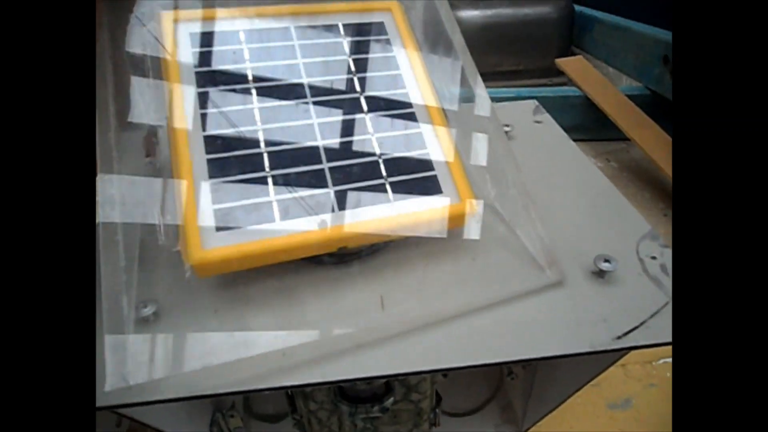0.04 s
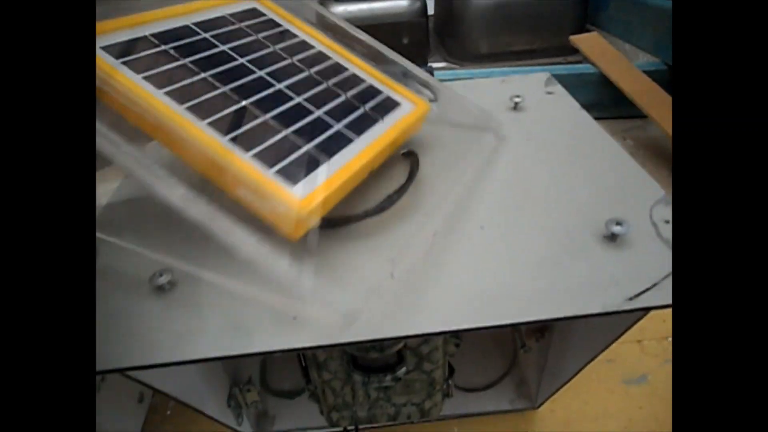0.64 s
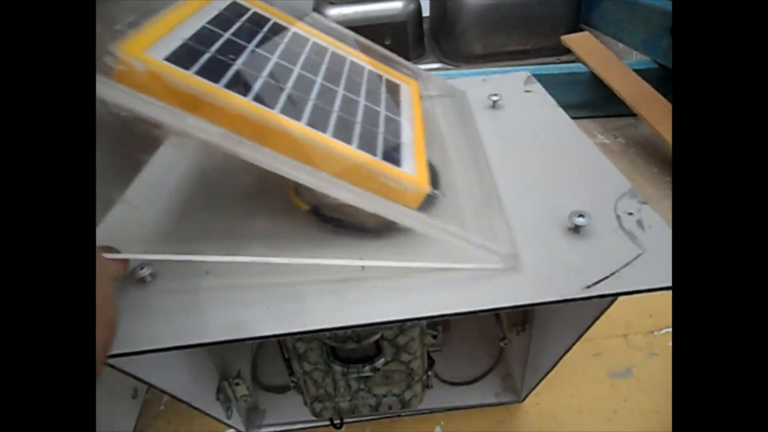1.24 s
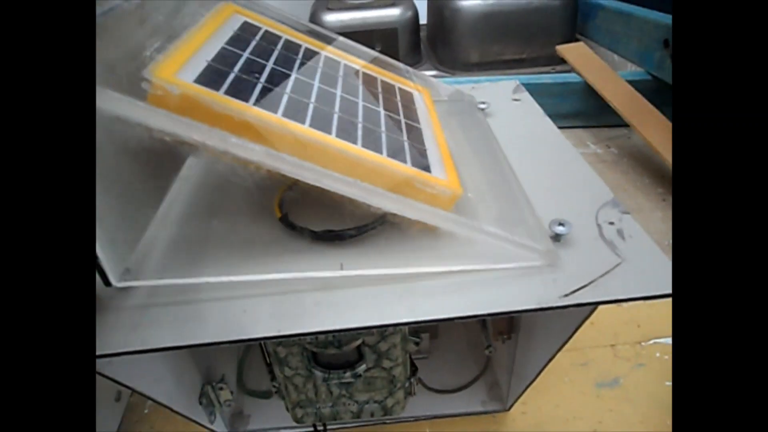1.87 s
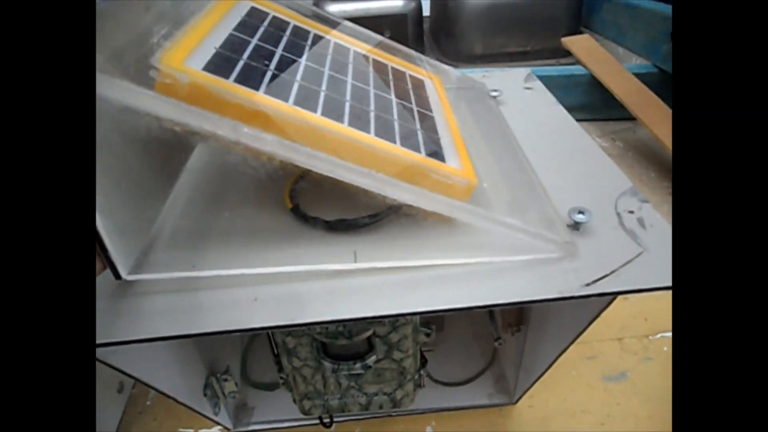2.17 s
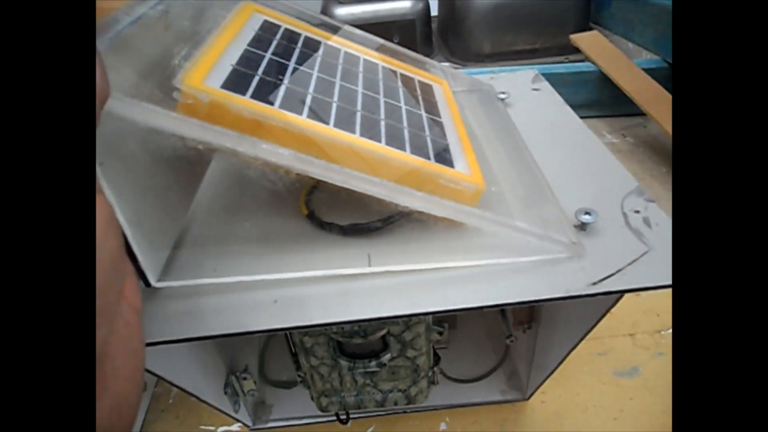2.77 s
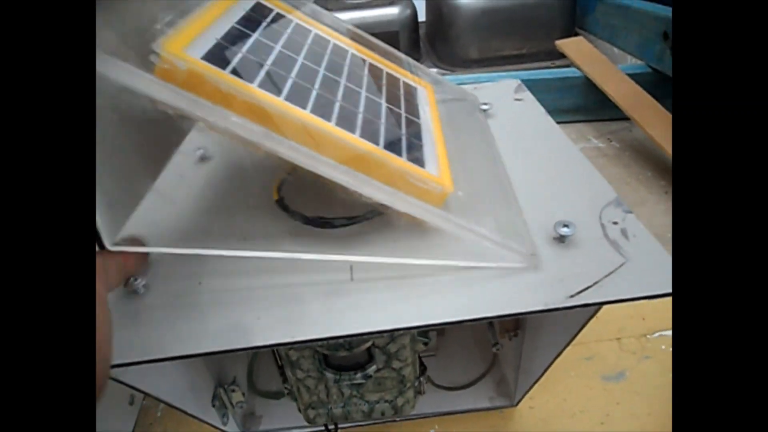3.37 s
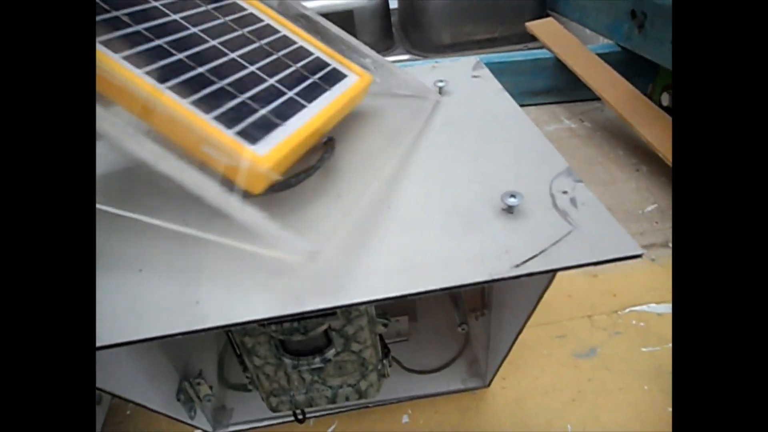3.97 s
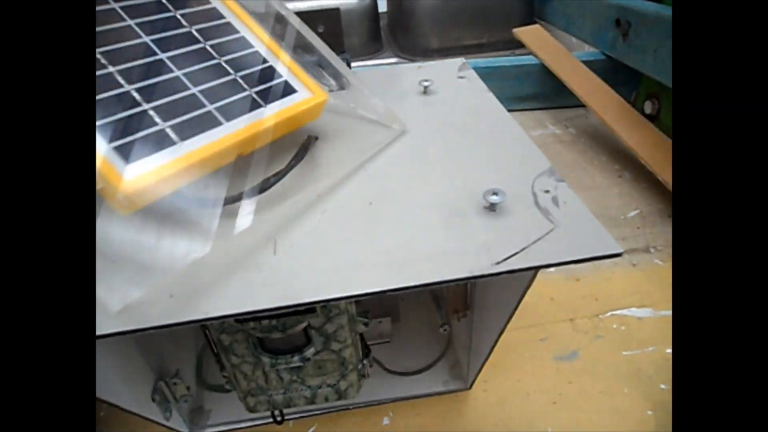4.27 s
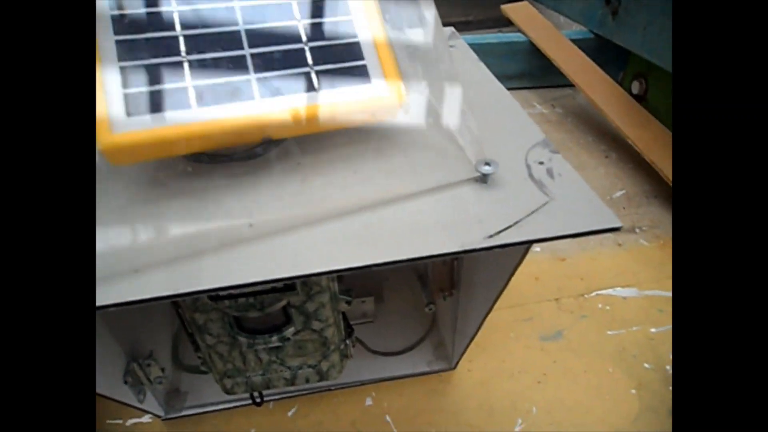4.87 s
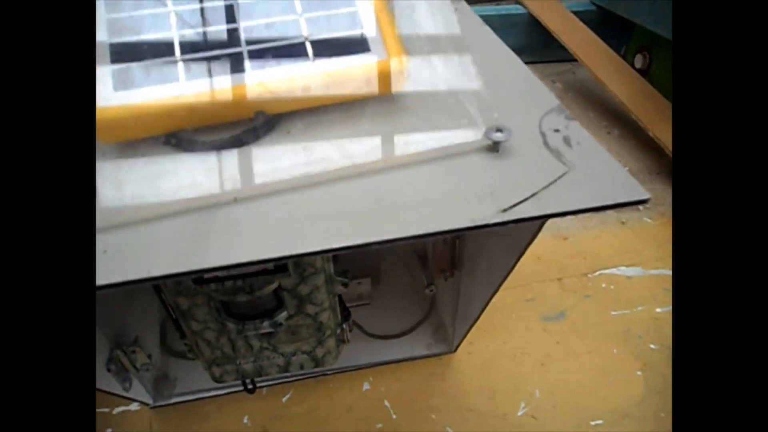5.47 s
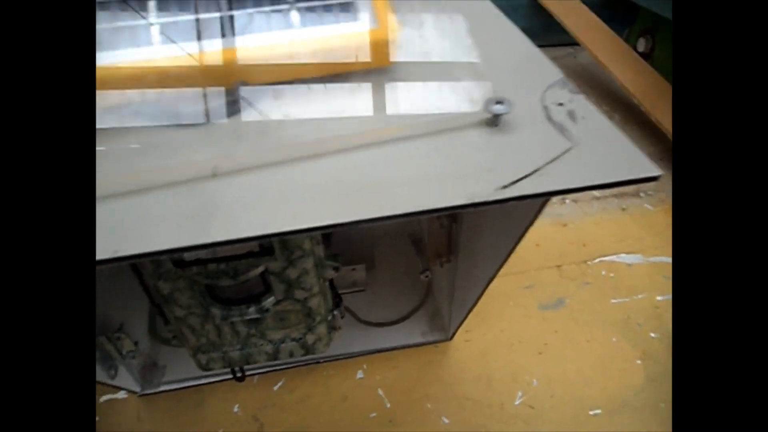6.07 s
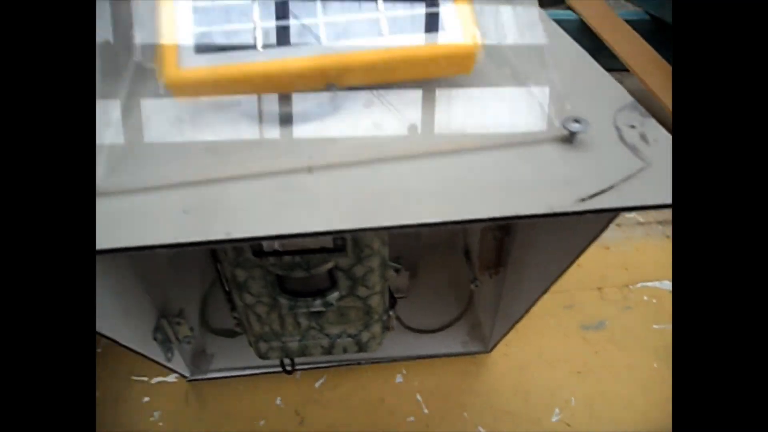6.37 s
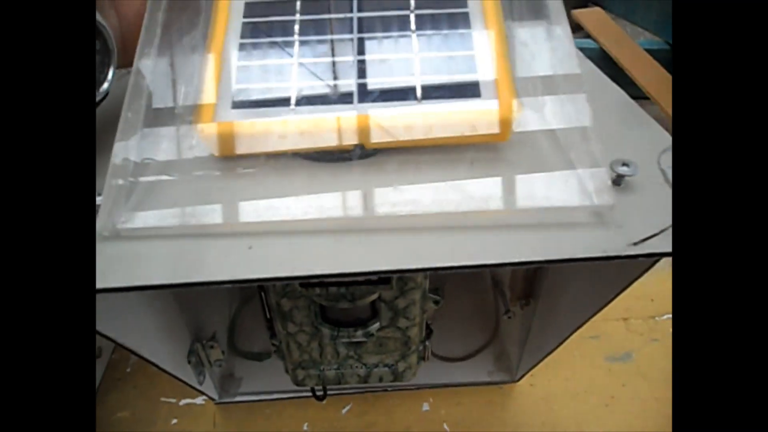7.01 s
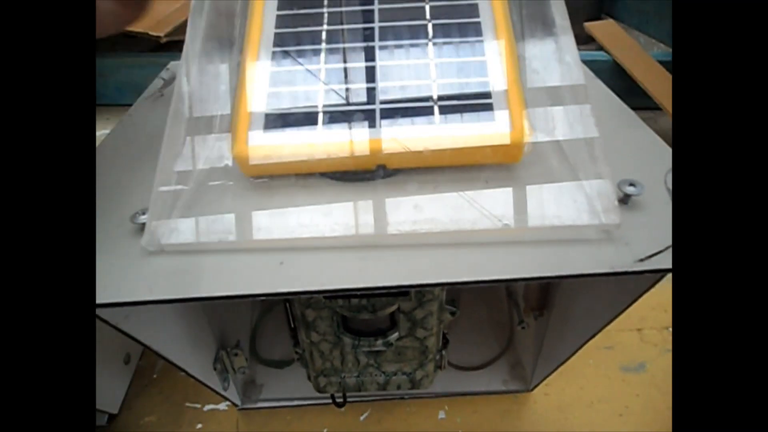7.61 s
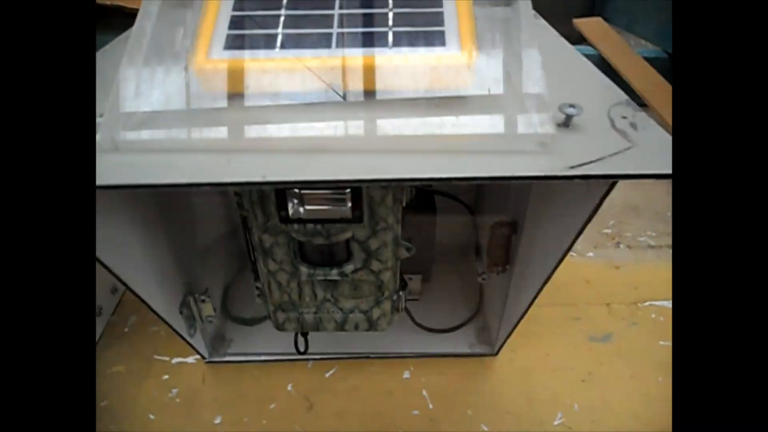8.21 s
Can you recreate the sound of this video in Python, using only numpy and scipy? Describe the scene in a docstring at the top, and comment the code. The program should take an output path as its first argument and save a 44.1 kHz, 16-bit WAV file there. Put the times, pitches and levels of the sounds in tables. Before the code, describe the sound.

A plastic cover is moved about on the lid of a hollow box, close to the microphone. Light scraping and taps build to a loud, boomy knock at 0.7 seconds, followed by rattling, a slide and a brief squeak. Another squeaky scrape ends in a firm knock at 1.5 seconds. Soft rubbing and taps fade by 2.2, leaving only faint hiss and low hum until a knock at 3.2. Quiet sliding follows, with tiny squeaks around 4 seconds and a briefly ringing knock at 4.6. Scattered clicks and knocks run from 5.1 to 6.4, then crowd together with scrapes. The loudest thump lands at 6.9 with a sharp click, a squeak and a short chatter, settling by 7.3. One faint tick comes near 8.1. Each knock rings briefly, with a weak tail from nearby walls.

```python
"""Plastic cover on a hollow box

Close by, in mono: a clear plastic cover carrying a small solar panel is shifted, tilted up and set down
again on the lid of a hollow box. Its edges knock and slide: the box booms, lid and plastic sheet ring
briefly, hard corners click and squeak. Nearby walls return a weak tail; a faint hum and hiss lie behind."""
import sys
import numpy as np
from scipy import signal
from scipy.fft import rfft, irfft
from scipy.io import wavfile

SR = 44100
rng = np.random.default_rng(int(sys.argv[2]) if len(sys.argv) > 2 else 0)


def pcm_store(signal):
    """Save signal as 16-bit PCM."""
    levels = np.round(np.clip(np.atleast_2d(signal), -1, 1) * 32767)
    wavfile.write(sys.argv[1], SR, levels.astype(np.int16).T)


N = 363825
TIME = np.arange(N) / SR
AGE = TIME[:SR // 2]  # seconds since a blow

# the low hum behind the box: time_s, level_db
HUM_LEVELS = [(0, -75), (2.2, -59), (2.7, -66), (3, -58), (3.9, -59), (4.3, -67.5), (6.4, -64),
              (7.5, -77.5)]
# spectra of hiss, rubbing rim, grit, squeaking edge and tick: frequency_hz, relative_db
HISS_SPECTRUM = [(12, -11), (28, 2.5), (50, -4.5), (110, -0.5), (180, -3.5), (260, -8), (600, -10.5),
                 (1200, -14.5), (3000, -19), (6000, -22), (10000, -26.5)]
RUB_SPECTRUM = [(50, -29.5), (110, -6.5), (190, 1), (260, -11), (400, -7), (590, -2), (720, -6),
                (1000, -18), (1400, -22.5), (2500, -49)]
RASP_SPECTRUM = [(700, -10), (1100, 4), (1400, -11.5), (1680, 3.5), (2050, -3), (2350, -7.5), (2700, -3.5),
                 (3200, -15), (6000, -31.5)]
SQUEAK_SPECTRUM = [(2000, -14), (2600, 4), (3150, -9), (3700, -3), (3900, -10.5), (4300, 4.5), (4900, -14),
                   (5300, -11.5), (5700, 1.5), (6600, -27), (7800, -7), (10000, -43.5)]
TICK_SPECTRUM = [(2200, -19.5), (3200, -3.5), (3800, 6.5), (4900, -5.5), (5800, -3.5), (7500, -13.5),
                 (10000, -13.5)]
# the cover sliding on the lid: start_s, end_s, strength_db, grit_db (relative to strength)
RIM_SLIDES = [(0, 0.151, -47.5, -16), (0.188, .64, -56, -9), (0.77, 0.998, -43.5, -14.5),
              (1.158, 1.47, -51, -16.5), (1.469, 1.554, -39.5, -17.5), (1.616, 2.126, -53.5, -30),
              (3.244, 3.85, -55.5, -23), (3.927, 3.97, -43, -15), (4.016, 4.168, -49.5, -9.5),
              (4.336, 4.441, -47.5, -10.5), (4.62, 4.676, -43, -14), (4.69, 4.85, -56, -15),
              (5.813, 6.103, -54, -25), (6.581, 6.621, -38, -19), (6.755, 6.861, -42.5, -16),
              (6.878, 6.965, -37, -15), (6.97, 7.083, -45.5, -18.5), (7.1, 7.3, -56, -19)]
# a sharp edge dragging: start_s, end_s, strength_db
EDGE_SQUEAKS = [(.863, .91, -46), (1.473, 1.54, -53), (4.015, 4.16, -65), (6.875, 6.95, -51.5)]
# the cover striking the lid; length_factor stretches both the contact and the ring:
# start_s, strength_db, tilt_db_per_octave (hardness), sheet_ring_db, length_factor, favoured_hz
COVER_KNOCKS = [(.211, -61, 6, 7, 1.4, 572), (0.431, -54.5, -4, 5.5, 0.78, 584),
                (.505, -42.5, -2.5, 0.5, 0.84, 585), (.575, -45.5, -5.5, 6.5, 0.78, 580),
                (.622, -48.5, -1.5, 8, 0.78, 560), (0.7047, -21.5, 1.5, 1, 0.49, 385),
                (0.751, -34, -3, 1, 0.87, 560), (.804, -44.5, 3.5, 2.5, 0.54, 525),
                (.833, -45, -4.5, 6.5, 1.5, 555), (.864, -39, -0.5, -1.5, 1.66, 507),
                (.908, -39, -8, 1.5, 0.69, 667), (.976, -52, -10, -5, .4, 355),
                (1.046, -57.5, 2.5, 4, .7, 524), (1.141, -48.5, -12, 5, .85, 525),
                (1.334, -42.5, -2.5, 4, .75, 616), (1.538, -33.5, -1.6, 9, 0.66, 512),
                (1.892, -57.5, -10.5, 1.5, .95, 525), (1.954, -48, -9, 2, 0.74, 400),
                (2.069, -59, -11, -3, 0.63, 382), (2.11, -63, 1, -2, 1.14, 382),
                (3.19, -44, -5, -5, 0.82, 474), (3.591, -55.5, -4, 3, .5, 580),
                (3.894, -51, -4, -1, 0.98, 380), (3.978, -57, -9, -3, 0.57, 385),
                (4.169, -54.5, -1, 6, 1.12, 430), (4.406, -55.5, 1.5, 7, 0.84, 566),
                (4.598, -43, 1.5, 12, 0.87, 578), (4.94, -61.5, -11, 6.5, 0.6, 558),
                (5.147, -58.5, 2, 0, 0.93, 670), (5.176, -56, 3.5, -5.5, 1.07, 576),
                (5.306, -63.5, 6, -13, 0.57, 584), (5.52, -55.5, -12, 1, 0.93, 565),
                (5.532, -48, 1, 14, 0.58, 552), (5.647, -42.5, -4, -5, 0.47, 465),
                (5.713, -55, -4, -3, 0.97, 385), (5.758, -36.5, -4.5, -6, 0.54, 447),
                (6.182, -58.5, -2.5, -8, 0.86, 372), (6.325, -41.5, -1, 0.5, 0.72, 391),
                (6.571, -56.5, -14.5, 9, 0.73, 578), (6.595, -56.5, -7, 17, 1, 600),
                (6.664, -36, -7, 0.5, 0.7, 370), (6.761, -41, -1, 8, 0.6, 579),
                (6.817, -49, -3, 9, 0.7, 583), (6.868, -19.5, -0.5, -4, 0.91, 399),
                (6.914, -38, 2, 3, 0.53, 360), (7.006, -37.5, -6.5, -7, 0.53, 477),
                (7.046, -45.5, -6.5, -12, 0.67, 509)]
# modes of box, lid and cover together: pitch_hz, relative_db, t60_s
BODY_MODES = [(153, -6, 0.12), (178, -7, .08), (192.9, -2, 0.21), (236, -16, 0.13), (326, -5.5, 0.13),
              (385, -1, 0.14), (447, -7, .14), (472, -3.5, .14), (525.5, -6, 0.16), (559.2, -3.5, .13),
              (585, -8.5, 0.23), (669, -4.5, 0.089), (757.6, -5.5, .13), (855, -3, 0.075),
              (945, -0.5, 0.077), (980, -5.5, 0.062), (1039, 0, 0.052), (1214, -5, 0.073), (1540, -3, .08),
              (1693, -2, 0.064), (1842, -3.5, .09), (2050, -8.5, .08), (2186, -8.5, 0.1),
              (2320, -6.5, 0.031), (2605, 1, .07), (2630, -2, 0.04), (2970, -9, .09)]
# registers of a blow, each with a crowd of weak modes, then the topmost one, the ping:
# low_hz, high_hz, crowd_db, crowd_t60_s, rise_s
BODY_REGISTERS = [(130, 220, -5, 0.29, 0.0053), (300, 500, -11.5, .06, .002), (472, 600, -8, .05, 0.00069),
                  (800, 1120, -2, 0.063, .0012), (1432, 2000, 2, .025, .001)]
TOP_REGISTER = (2200, 2850, 2.9, 0.043, 0.0012)
# hard corners catching: start_s, level_db
CORNER_CLICKS = [(.804, -49), (.909, -51), (1.54, -45.5), (4.101, -53), (5.147, -53.5), (5.177, -48.5),
                 (6.663, -44.5), (6.8725, -28), (6.914, -44.5), (7.182, -58), (8.123, -61)]
# a corner letting go: start_s, length_s, start_hz, end_hz, level_db
CORNER_SQUEAL = (3.94, .026, 2200, 1800, -54)

PIVOT_HZ, KNEE_HZ, ROLLOFF_DB_PER_OCTAVE = 400, 1000, 14  # spectrum of a blow
TAIL_DB, TAIL_T60_S = -20.5, 0.6  # return from walls and clutter


def from_db(db):
    return 10 ** (np.asarray(db) / 20)


def unit_rms(x, size=None):
    """Scale to rms 1 over the first `size` samples."""
    return x / np.sqrt(np.mean(x[:size] ** 2) + 1e-20)


def decay(t60):
    """Envelope that falls 60 dB in t60 seconds."""
    return np.exp(-np.log(1000) * AGE / max(t60, 1e-3))


def add(out, start_s, sound):
    at = max(round(start_s * SR), 0)
    out[at:at + len(sound)] += sound[:N - at]


def noise_band(low_hz, high_hz, order):
    """Half a second of band-passed noise, taken once the filter has settled; rms 1."""
    sos = signal.butter(order, [low_hz, high_hz], "band", fs=SR, output="sos")
    noise = rng.standard_normal(len(AGE))
    return unit_rms(signal.sosfilt(sos, np.tile(noise, 2))[len(AGE):])


def coloured(x, spectrum):
    """Filter a steady sound by a spectrum; rms 1."""
    hz, db = np.transpose(spectrum)
    bins_hz = np.maximum(np.fft.rfftfreq(len(x), 1 / SR), 1)
    gain = from_db(np.interp(np.log(bins_hz), np.log(hz), db))
    return unit_rms(irfft(rfft(x) * gain, len(x)))


def drift(rate_hz):
    """Random wander with a spread near 1."""
    return np.interp(TIME * rate_hz, np.arange(4096), rng.standard_normal(4096))


def hiss(early_db=-54, settled_db=-59, settles_s=.69):
    """An even hiss behind the box that steps down early on."""
    level_db = np.where(TIME < settles_s, early_db, settled_db)
    return from_db(level_db) * coloured(rng.standard_normal(N), HISS_SPECTRUM)


def hum(pitch_hz=76.2):
    """A faint low tone in the background, wavering slightly in pitch and level."""
    phase = 2 * np.pi * np.cumsum(pitch_hz + .5 * drift(5)) / SR
    level_db = np.interp(TIME, *np.transpose(HUM_LEVELS)) + 1.2 * drift(7)
    return from_db(level_db) * np.sqrt(2) * np.sin(phase)


def slips(per_s, spread_db):
    """Stick and slip: tiny jerks of uneven size, in clumps."""
    slipping = rng.random(N) < per_s * from_db(4 * drift(45)) / SR
    return slipping * rng.standard_normal(N) * from_db(spread_db * drift(90))


def strokes(rows, attack_s=.012, release_t60_s=.0998):
    """Gain for rows of start_s, end_s, level_db: each sets in quickly and dies when the rim stops."""
    gain = np.zeros(N)
    for start_s, end_s, level_db in rows:
        attack = np.clip(.5 + (TIME - start_s) / attack_s, 0, 1)
        release_db = -60 * np.clip((TIME - end_s) / release_t60_s, 0, 2)
        gain += attack * from_db(level_db + release_db)
    return gain


def sliding(rub_db=-5.5, rasp_db=-.5, squeak_db=-8):
    """Slips of the rim shake the same modes as the knocks; grit under it rasps, a sharp edge squeaks."""
    jerks = slips(per_s=700, spread_db=2.2) + 1e-18
    ring = np.zeros(N)
    for k, (hz, db, t60) in enumerate(BODY_MODES):
        radius = np.exp(-np.log(1000) / (t60 * SR))
        feedback = [1, -2 * radius * np.cos(2 * np.pi * hz / SR), radius ** 2]
        ring += (-1) ** k * from_db(db) * signal.lfilter([1 - radius, 0, radius - 1], feedback, jerks)
    grit = slips(per_s=2500, spread_db=2.5)
    rub = unit_rms(coloured(jerks, RUB_SPECTRUM) + from_db(-5) * coloured(ring, RUB_SPECTRUM))
    rasp = unit_rms(coloured(grit, RASP_SPECTRUM) + from_db(-6) * coloured(ring, RASP_SPECTRUM))
    squeak = coloured(grit, SQUEAK_SPECTRUM)
    rub_gain = strokes((start, end, db + rub_db) for start, end, db, _ in RIM_SLIDES)
    rasp_gain = strokes((start, end, db + grit_db + rasp_db) for start, end, db, grit_db in RIM_SLIDES)
    squeak_gain = from_db(squeak_db) * strokes(EDGE_SQUEAKS)
    return rub * rub_gain + rasp * (rasp_gain + chatter()) + squeak * squeak_gain


def blow_db(strength_db, tilt_db, hz):
    """Soft blows favour the bass, hard ones the treble; above the knee the plastic gives way."""
    tilt = tilt_db * np.log2(min(hz, KNEE_HZ) / PIVOT_HZ)
    rolloff = ROLLOFF_DB_PER_OCTAVE * np.log2(max(hz / KNEE_HZ, 1))
    return strength_db + tilt - rolloff


def registers():
    """Each register with its own modes, from the boom up to the ping."""
    groups = np.split(np.array(BODY_MODES), [4, 8, 12, 18, 23])
    return [(*register, modes) for register, modes in zip([*BODY_REGISTERS, TOP_REGISTER], groups)]


def struck_register(register, length, favoured_hz=0):
    """One register rings: the direct sound reaches the microphone, then a weak tail off nearby walls."""
    low_hz, high_hz, crowd_db, crowd_t60_s, rise_s, modes = register
    hz, db, t60 = modes.T
    first_30_ms = round(.03 * SR)
    # the point of contact picks out one note and weights the others anew
    db = db + 8 * np.exp(-((hz - favoured_hz) / 12) ** 2) + 2 * rng.standard_normal(len(hz))
    # each mode drops quickly as the contact damps it, then rings on faintly
    fades = np.array([decay(t * length) + from_db(-20) * decay(3.5 * t * length) for t in t60])
    tones = np.sin(2 * np.pi * (hz[:, None] * AGE + rng.random((len(hz), 1))))
    ring = unit_rms(from_db(db) @ (fades * tones), first_30_ms)
    crowd = unit_rms(noise_band(low_hz, high_hz, order=4) * decay(crowd_t60_s * length), first_30_ms)
    # a longer, softer contact sets in more slowly
    onset = 1 - np.exp(-(AGE / (.9 * rise_s * length)) ** 2)
    direct = unit_rms((ring + from_db(crowd_db) * crowd) * onset, first_30_ms)
    # the tail dies sooner in the treble
    tail_gain = from_db(TAIL_DB) * decay(TAIL_T60_S / (1 + low_hz / 2500)) * (1 - np.exp(-AGE / .015))
    return direct + tail_gain * noise_band(low_hz, high_hz, order=4)


def tick(t60_s=.0286):
    """The brief, bright noise of a hard contact."""
    return coloured(rng.standard_normal(len(AGE)), TICK_SPECTRUM) * decay(t60_s)


def knocks(tick_db=-22, sheet_register=2):
    """Each blow ticks and feeds the registers by strength and hardness; one on an edge rings the sheet."""
    out = np.zeros(N)
    for start_s, strength_db, tilt_db, sheet_db, length, favoured_hz in COVER_KNOCKS:
        for k, register in enumerate(registers()):
            centre_hz = np.sqrt(register[0] * register[1])
            level_db = blow_db(strength_db, tilt_db, centre_hz) + sheet_db * (k == sheet_register)
            add(out, start_s, from_db(level_db) * struck_register(register, length, favoured_hz))
        add(out, start_s, from_db(blow_db(strength_db, tilt_db, KNEE_HZ) + tick_db) * tick())
    return out


def shudder(thud_db=-25.5):
    """The whole box shakes under a long, soft contact; a brief one hardly moves it."""
    out = np.zeros(N)
    for start_s, strength_db, tilt_db, _, length, _ in COVER_KNOCKS:
        gain = from_db(blow_db(strength_db, tilt_db, hz=130) + thud_db) * min(length, 1) ** 3
        shake = noise_band(low_hz=28, high_hz=115, order=2)
        add(out, start_s, gain * shake * decay(TAIL_T60_S * length))
    return out


def chatter(heavy_above_db=-25, relative_db=-20, t60_s=.36):
    """Extra gain for the rasp: after a heavy drop the cover chatters on the lid, dying away."""
    gain = np.zeros(N)
    for start_s, strength_db, _, _, length, _ in COVER_KNOCKS:
        if strength_db > heavy_above_db:
            add(gain, start_s, from_db(strength_db + relative_db) * length * decay(t60_s))
    return gain


def clicks(ping_db=-6.5):
    """A hard corner catches: it ticks and briefly rings the highest modes."""
    out = np.zeros(N)
    for start_s, level_db in CORNER_CLICKS:
        click = tick() + from_db(ping_db) * struck_register(registers()[-1], length=.85)
        add(out, start_s, from_db(level_db) * click)
    return out


def squeal(roughness=.04):
    """A corner lets go with a short, rough tone whose pitch falls as the slip slows."""
    start_s, length_s, start_hz, end_hz, level_db = CORNER_SQUEAL
    progress = np.clip((TIME - start_s) / length_s, 0, 1)
    pitch_hz = (start_hz + (end_hz - start_hz) * progress) * (1 + roughness * drift(400))
    tone = np.sqrt(2) * np.sin(2 * np.pi * np.cumsum(pitch_hz) / SR)
    return from_db(level_db) * np.sin(np.pi * progress) * tone


def scene():
    """Cover and box in front, hiss and hum behind, all at one microphone."""
    return (knocks() + shudder() + clicks() + sliding() + squeal() + hiss() + hum())[None]


def record(dry):
    """The highest peaks are rounded off and the treble is cut steeply."""
    ceiling, cutoff_hz = .88, 10700
    rounded = dry / (1 + (dry / ceiling) ** 8) ** (1 / 8)
    return signal.sosfilt(signal.ellip(10, .1, 70, cutoff_hz, fs=SR, output="sos"), rounded)


dry = scene()
out = record(dry)
pcm_store(out)
```